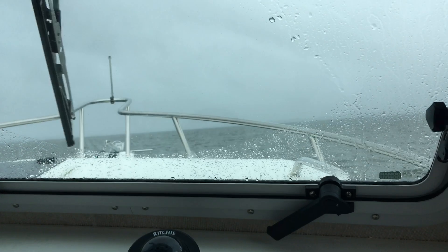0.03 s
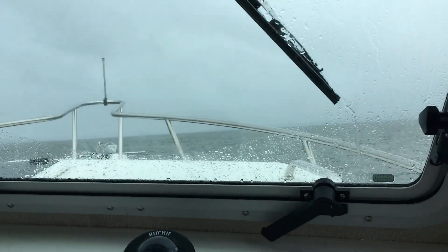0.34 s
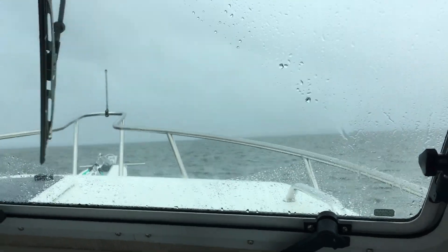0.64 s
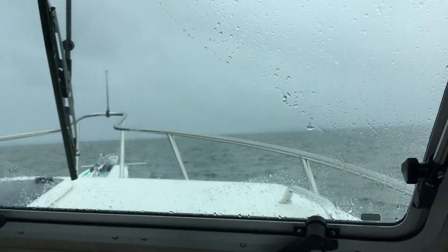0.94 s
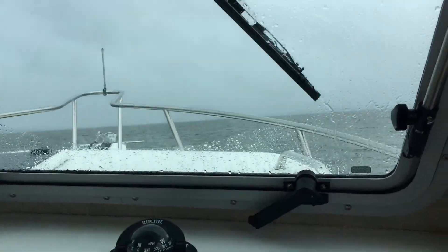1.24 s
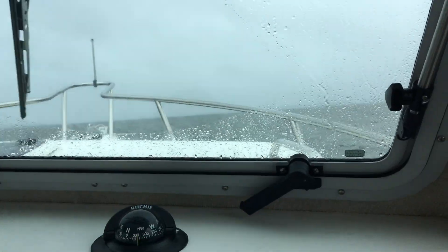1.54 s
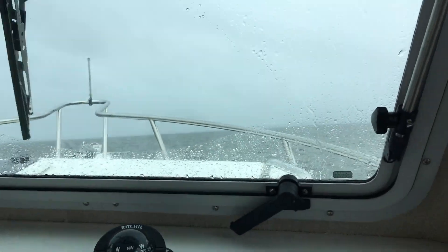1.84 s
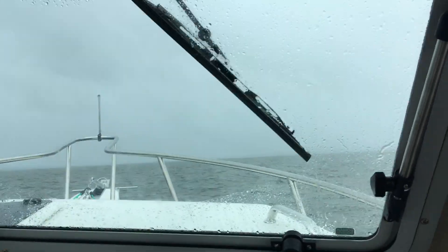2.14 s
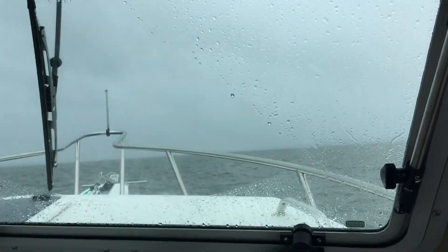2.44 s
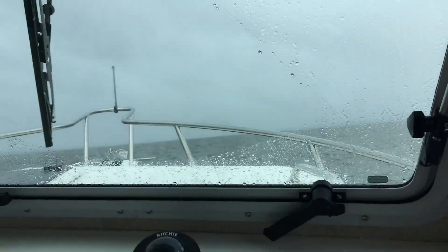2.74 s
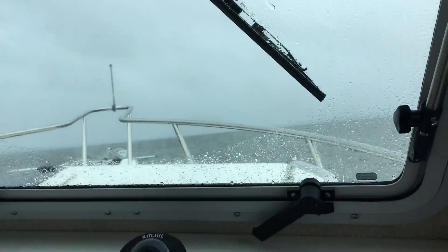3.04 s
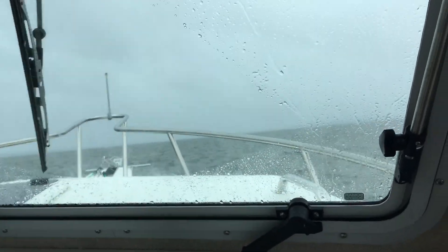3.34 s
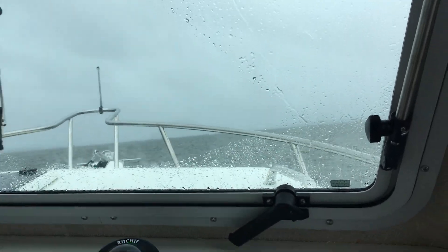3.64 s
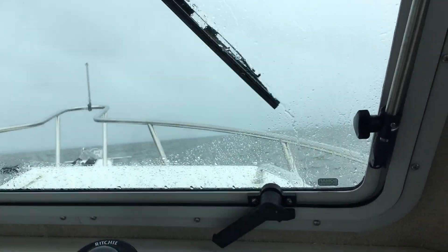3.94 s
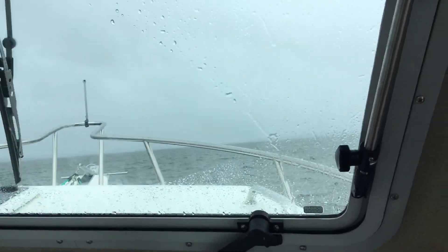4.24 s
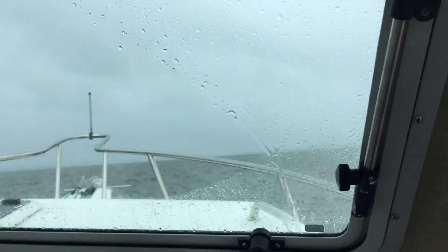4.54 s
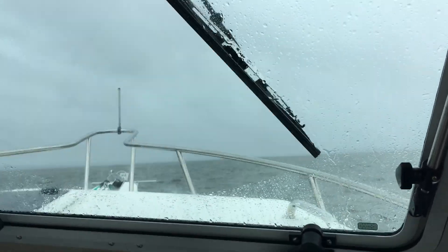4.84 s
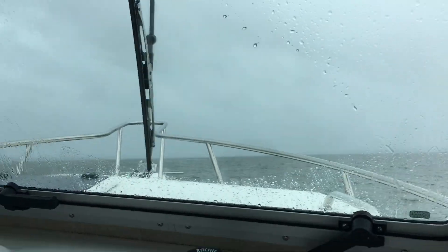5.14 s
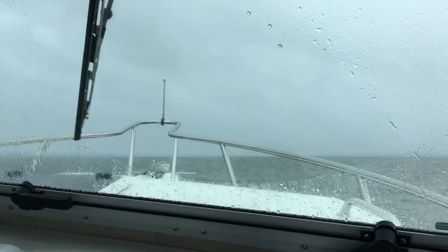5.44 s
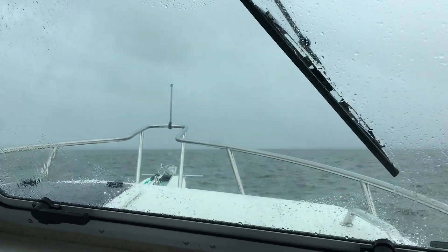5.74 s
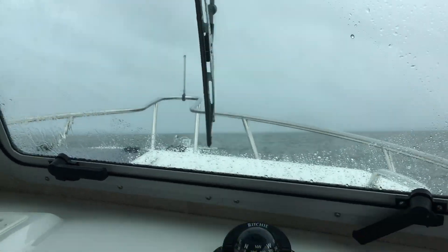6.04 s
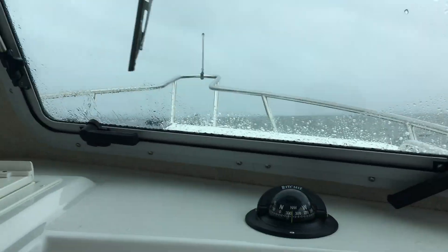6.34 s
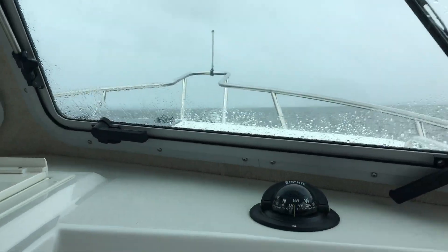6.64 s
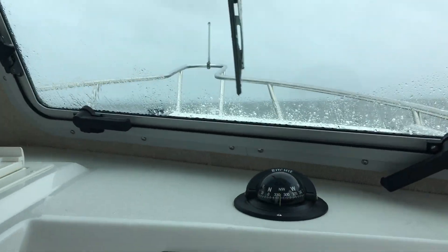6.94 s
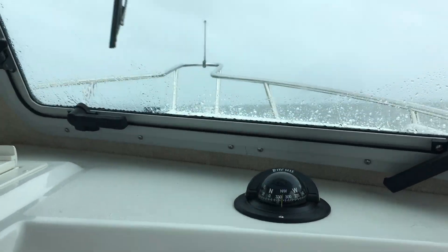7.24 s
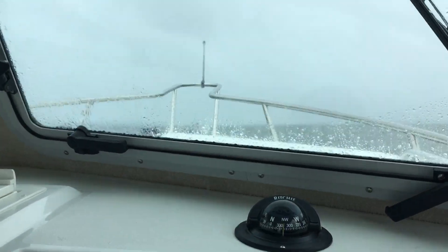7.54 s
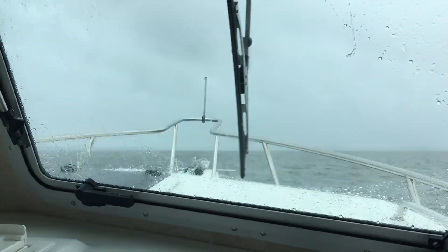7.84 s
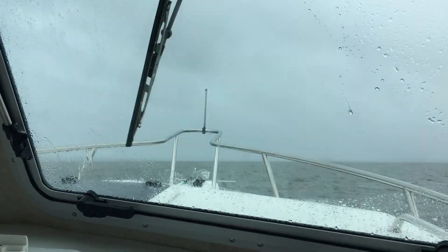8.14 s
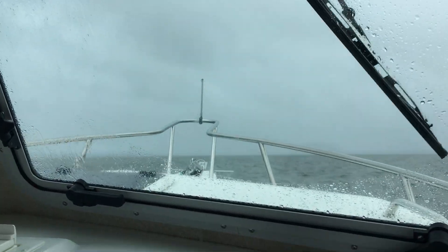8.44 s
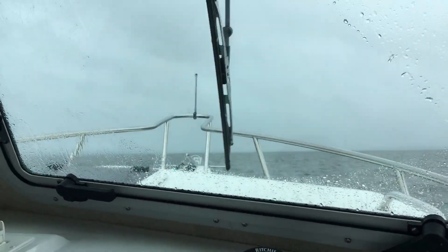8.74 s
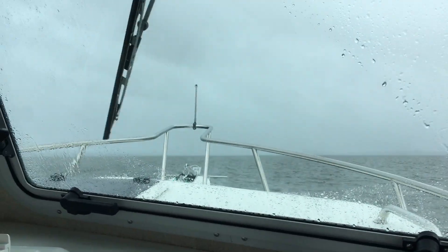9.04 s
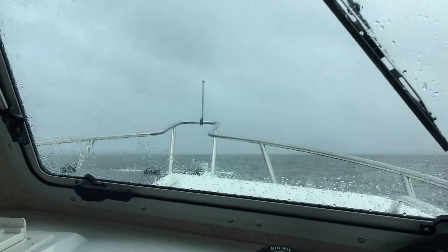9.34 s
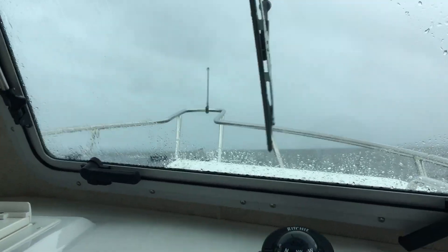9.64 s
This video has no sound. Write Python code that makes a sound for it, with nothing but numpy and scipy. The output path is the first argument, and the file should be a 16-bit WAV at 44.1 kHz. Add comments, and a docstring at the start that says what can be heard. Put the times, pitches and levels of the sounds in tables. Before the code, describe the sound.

Inside the enclosed wheelhouse of a motorboat, the engine drones steadily with a fast throb and light clatter over a deep hull rumble. Choppy waves strike a few times a second, making uneven thuds, slaps and low booms, the hardest about halfway through. Water splashes on deck, spray hisses, and occasional bursts of drops crackle on the windscreen just in front of the microphone.

```python
"""Inside the wheelhouse of a motorboat running through chop.
From the start the engine drones, clatters and beats against the propeller, the hull rumbles, spray hisses.
From 0.3 s waves strike: the bottom thuds, the bow panels slap, the hull booms and water splashes on deck.
From 0.9 s gouts spatter on the windscreen. The hardest thud, near 4.5 s, makes the limiter duck;
around 6 s the engine's higher tones fade a little as the boat comes round."""
import sys
import numpy as np
from scipy import signal
from scipy.fft import rfft, irfft, next_fast_len
from scipy.io import wavfile
from scipy.ndimage import uniform_filter1d, minimum_filter1d

SR = 44100
rng = np.random.default_rng(int(sys.argv[2]) if len(sys.argv) > 2 else 0)


def wav_out(sig):
    """Save sig, one row per channel (or a flat mono array), as 16-bit PCM at SR to the path in sys.argv[1]."""
    wavfile.write(sys.argv[1], SR, np.round(np.clip(np.atleast_2d(sig).T, -1, 1) * 32767).astype(np.int16))


N = 431738


def from_db(db):
    """Amplitude ratio of a level."""
    return 10 ** (np.asarray(db) / 20)


def rms_one(x):
    """Normalisation to unit power."""
    return x / np.sqrt(np.mean(x ** 2) + 1e-20)


def peak_one(x):
    """Normalisation to unit peak."""
    return x / np.abs(x).max()


def in_time(rows):
    """Linear interpolation of each column at every sample."""
    s, *columns = np.transpose(rows)
    return [np.interp(np.arange(N) / SR, s, c) for c in columns]


def colour(x, spectrum):
    """Spectral shaping of a flat excitation; rms 1."""
    size = next_fast_len(N)
    hz, db = np.transpose(spectrum)
    bins = np.maximum(np.arange(size // 2 + 1) * SR / size, 1)
    gain = from_db(np.interp(np.log(bins), np.log(hz), db))
    skirts = np.minimum(bins / hz[0], 1) ** 2 * np.minimum(hz[-1] / bins, 1) ** 2
    return rms_one(irfft(rfft(x, size) * gain * skirts, size)[:N])


def drift(rate_hz):
    """Random modulation: low-passed noise of rms 1."""
    step, settle = 40, 2000
    r = np.exp(-2 * np.pi * step * rate_hz / SR)
    slow = signal.lfilter([1], [1, -2 * r, r * r], rng.standard_normal(N // step + settle + 2))[settle:]
    return np.interp(np.arange(N) / step, np.arange(len(slow)), rms_one(slow))


def resonate(x, hz, width_hz):
    """Second-order resonance with unit peak gain."""
    r = np.exp(-np.pi * width_hz / SR)
    feedback = [1, -2 * r * np.cos(2 * np.pi * hz / SR), r * r]
    return signal.lfilter(np.array([1, 0, -1]) * (1 - r * r) / 2, feedback, x)


def band(x, hz, width_hz):
    """Two equal resonances in cascade."""
    return resonate(resonate(x, hz, width_hz), hz, width_hz)


def ring(force, hz, t60):
    """Damped oscillator: a unit impulse starts a decaying sine of height 1."""
    r, w = from_db(-60 / (t60 * SR)), 2 * np.pi * hz / SR
    return signal.lfilter([0, np.sin(w)], [1, -2 * r * np.cos(w), r * r], force + 1e-18)


def struck(force, modes, centre_hz, octaves):
    """Modal superposition: where a wave lands decides which modes answer most; peak 1."""
    sound = 0
    for hz, db, t60 in modes:
        coupling = from_db(db) / (1 + (np.log2(hz / centre_hz) / octaves) ** 2)
        sound += coupling * ring(force * rng.standard_normal(len(force)), hz, t60)
    return peak_one(sound)


def drops(per_s, spread_db):
    """Shot noise: random impacts, mostly small and a few large."""
    sizes = from_db(spread_db * np.minimum(rng.exponential(1, N), 5)) * rng.choice([-1, 1], N)
    return sizes * (rng.random(N) < per_s / SR)


def add(out, s, sound):
    """Superpose a sound starting at time s."""
    at = max(round(s * SR), 0)
    out[at:at + len(sound)] += sound[:N - at]


def shaft(hz, wander, rate_hz):
    """Frequency modulation: the phase of a rotation whose speed wanders with the load."""
    return 2 * np.pi * np.cumsum(hz * (1 + wander * drift(rate_hz))) / SR


def tones(angle, orders, waver_db):
    """Harmonic series of a rotation, each partial wavering by itself; 0 dB has rms 1."""
    return np.sqrt(2) * sum(
        from_db(db + waver_db * drift(2.37)) * np.sin(k * angle + rng.uniform(0, 2 * np.pi))
        for k, db in orders)


def swells(levels_db, delay_s, width_s):
    """Power summation: a Gaussian envelope after the crest of each of the WAVES."""
    t = np.arange(0, N, 40) / SR
    power = sum((from_db(db) * np.exp(-.5 * ((t - s - crest_s - delay_s) / width_s) ** 2)) ** 2
                for (s, crest_s, *_), db in zip(WAVES, levels_db))
    return np.interp(np.arange(N) / SR, t, np.sqrt(power))


def waver(db, swing_db, rate_hz):
    """Amplitude modulation: a gain that wanders about a level."""
    return from_db(db + swing_db * drift(rate_hz))


# engine harmonics, the third being the firing rate: multiple of crank speed, relative level/dB
ENGINE_ORDERS = [(1, -18), (3, 0), (4, -9), (5, -19), (6, -18), (8, -31), (9, -29), (10, -31), (12, -29)]
# load on the drive: t/s, firing level/dB, propeller level/dB
DRIVE_LOAD = [(0, -23.5, -25), (.7, -24, -23.5), (2.1, -25.5, -25.5), (2.8, -24, -24.5), (4.2, -25, -25.5),
              (5.6, -24.5, -27), (7, -24.5, -29.5), (9.79, -24, -29.5)]
# a high engine order singing in the cabin: t/s, level/dB
SINGING_LEVEL = [(0, -50), (5.6, -51.5), (6.5, -54), (9.79, -52)]
CRANK_HZ, SINGING_ORDER = 34.5, 15

def engine():
    """Periodic excitation: firing gives harmonics of the crank speed."""
    firing_db, _ = in_time(DRIVE_LOAD)
    singing_db, = in_time(SINGING_LEVEL)
    crank = shaft(CRANK_HZ, wander=.0025, rate_hz=1.2)
    drone = from_db(firing_db) * tones(crank, ENGINE_ORDERS, waver_db=2.5)
    singing = from_db(singing_db) * tones(crank, [(SINGING_ORDER, 0)], waver_db=1)
    return drone + singing


# clatter spectrum: f/Hz, relative level/dB
CLATTER_SPECTRUM = [(150, -23), (300, 4), (530, -0.5), (650, -4.5), (800, -9.5), (1000, -8), (1180, -10),
                    (1310, -24.5), (1450, -15), (2400, -16.5), (4000, -22.5), (9000, -64)]
# machinery whines: f/Hz, bandwidth/Hz, relative level/dB
WHINE_BANDS = [(1297, 174, -57.5), (4386, 83, -69.5)]

def machinery():
    """Broadband noise clatters; narrowband noise whines, fading a little as the boat comes round."""
    clatter = from_db(-42.5) * colour(rng.standard_normal(N), CLATTER_SPECTRUM)
    turn_db, = in_time([(0, 4.5), (4.3, 3), (5.6, 0.5), (9.79, 3)])  # t/s, gain/dB
    whine = sum(waver(db + turn_db, 2, rate_hz=2.2) * rms_one(band(rng.standard_normal(N), hz, width_hz))
                for hz, width_hz, db in WHINE_BANDS)
    return clatter + whine


# propeller harmonics: multiple of blade rate, relative level/dB
BLADE_ORDERS = [(1, 0), (2, -21), (3, -34)]
BLADE_HZ = 118.1

def propeller():
    """Beating: the blade tone interferes with the firing tone about fifteen times a second."""
    _, blade_db = in_time(DRIVE_LOAD)
    blade = shaft(BLADE_HZ, wander=.004, rate_hz=2.5)
    return from_db(blade_db) * tones(blade, BLADE_ORDERS, waver_db=2.36)


# hull rumble spectrum: f/Hz, relative level/dB
RUMBLE_SPECTRUM = [(20, -30), (40, -24), (65, -4), (82, -0.5), (113, -4.5), (133, -11), (150, -8.5),
                   (165, -17.5), (200, -16), (238, -15.5), (260, -39.5), (400, -33), (900, -56)]

def hull():
    """Forced vibration: flow keeps the hull rumbling; its lowest mode booms just after each wave."""
    *_, boom_db = np.transpose(WAVES)
    chop = waver(-29, 4.5, rate_hz=7)
    heave = np.hypot(swells(boom_db, delay_s=.055, width_s=.035), chop)
    lowest_mode = [(24, -26), (40, -15.5), (50, -2), (56, -2.5), (62, -6), (76, -17)]  # f/Hz, level/dB
    flex = colour(rng.standard_normal(N), lowest_mode)
    envelope = np.abs(signal.hilbert(flex, next_fast_len(N))[:N])
    boom = heave * rms_one(flex / (envelope + 1.2))  # evened out, so that the heave shapes it
    rumble = waver(-23.5, 1.67, rate_hz=8.2) * colour(rng.standard_normal(N), RUMBLE_SPECTRUM)
    return boom + rumble


# spectra of bow wash, deck splash and fine spray: f/Hz, relative level/dB
WASH_SPECTRUM = [(120, -36), (250, 9), (400, 0.5), (560, 5), (750, -3), (1300, -7.5), (2500, -14.5),
                 (6000, -33)]
SPLASH_SPECTRUM = [(400, -36), (900, 6.5), (1500, 3.5), (2500, 3.5), (3300, 0.5), (4500, -4.5), (7000, -11),
                   (15000, -11.5)]
SPRAY_SPECTRUM = [(1000, -21), (3000, -14.5), (6000, 4.5), (9000, 3), (12000, 1.5), (16000, -0.5)]
# water in the air: t/s, splash level/dB, relative spray level/dB
AIRBORNE_WATER = [(0, -46, -51), (.3, -50, -52.5), (1.25, -48, -52.5), (1.53, -48.5, -49),
                  (1.8, -51, -54.7), (2.3, -49.5, -52.5), (2.9, -46.5, -50.5), (3.5, -51, -53),
                  (4.44, -49, -53), (4.48, -57, -46.5), (4.55, -54, -54), (4.7, -48.5, -51),
                  (5.1, -49, -51), (5.4, -51.5, -53.5), (5.8, -46, -53.5), (6.1, -49, -49.3),
                  (6.72, -50, -53), (7.22, -48, -50), (7.68, -48.5, -53), (7.97, -48, -49.5),
                  (8.13, -46.5, -53), (8.75, -50.5, -50.5), (8.9, -50, -49.5), (9.15, -45.5, -53.5),
                  (9.4, -47, -51), (9.53, -49, -51.5), (9.79, -45.5, -47)]
WASH_OVER_SLAP_DB, SPLASH_OVER_SLAP_DB = -18.5, -32.5

def water():
    """Shot noise of drops: wash gurgles at the bow, water splashes on deck, spray hisses on the glass."""
    *_, slap_db, _, _ = np.transpose(WAVES)
    splash_db, spray_db = in_time(AIRBORNE_WATER)
    chop = waver(-48, 3.5, rate_hz=5.1)
    bow = np.hypot(swells(slap_db + WASH_OVER_SLAP_DB, delay_s=.004, width_s=.034), chop)
    thrown = np.hypot(swells(slap_db + SPLASH_OVER_SLAP_DB, delay_s=.04, width_s=.07), from_db(splash_db))
    wash = bow * waver(0, 2, rate_hz=32) * colour(drops(1500, spread_db=3), WASH_SPECTRUM)
    splash = thrown * waver(0, 1.2, rate_hz=31) * colour(drops(7000, spread_db=2.5), SPLASH_SPECTRUM)
    spray = waver(spray_db + 2.5, .78, rate_hz=24) * colour(drops(30000, spread_db=3), SPRAY_SPECTRUM)
    return wash + splash + spray


# hull and cabin modes: f/Hz, relative level/dB, T60/s
HULL_MODES = [(87, 3.5, 0.59), (95, -31, 0.06), (119.8, 5, 0.1), (159, 0.5, 0.25), (201, 10.5, 0.11),
              (225, -2.5, 0.21)]

def thud(t, crest_s, hz):
    """Added mass: the struck bottom sinks in pitch as it digs in and drags more water along; peak 1."""
    age = t / (crest_s + .0077)
    swell = (age * np.exp(1 - age)) ** 2.15
    pitch = hz * (.97 + .13 * np.tanh(1 - age) + .03 * drift(25)[:len(t)])
    swing = swell * np.sin(2 * np.pi * np.cumsum(pitch) / SR + rng.uniform(0, 2 * np.pi))
    return peak_one(swing + from_db(-5.5) * struck(swell, HULL_MODES, hz, octaves=.82))


# bow panel modes: f/Hz, relative level/dB, T60/s
PANEL_MODES = [(295, 3, 0.12), (339, 1, 0.085), (372, 4.5, 0.1), (446, -3, 0.14), (490, 1, 0.038),
               (542, -2.5, 0.094), (594, -11.5, 0.088), (727, -2, 0.039), (906, -3.5, 0.022),
               (1090, 7, 0.011), (1390, 4.5, 0.013), (1660, 1, 0.026), (2370, 8, 0.013)]
# waves striking the hull: t/s, rise to crest/s, thud level/dB, nominal thud f/Hz,
# relative slap level/dB, slap centre f/Hz, boom level/dB
WAVES = [(.333, 0.011, -10, 146, -25.5, 460, -15), (.539, 0.017, -11.5, 120, -47, 700, -35),
         (0.729, 0.031, -27, 99, -32, 600, -17), (.905, 0.019, -9.5, 112, -33, 1000, -16),
         (1.019, 0.02, -2.5, 121.3, -25, 523, -15.5), (1.198, 0.025, -9.5, 115, -29, 674, -19.5),
         (1.432, 0.022, -8.5, 116, -29, 690, -15), (1.561, 0.021, -8.5, 119.5, -29.5, 836, -33),
         (1.77, 0.0057, -10.5, 104, -42, 700, -11), (2.16, 0.0086, -8.5, 131, -27, 600, -12),
         (2.512, 0.025, -12.5, 163.2, -24.5, 610, -14.5), (2.92, 0.011, -13.5, 133, -25.5, 513, -26),
         (3.002, 0.0045, -7.5, 114.6, -37, 700, -36), (3.186, 0.019, 0.5, 107, -19.5, 530, -14.5),
         (3.42, 0.012, -5.5, 105.7, -27, 600, -15.5), (3.752, 0.0082, -8.5, 108, -23.5, 600, -13.5),
         (4.237, 0.015, -7, 106.7, -30, 553, -12.5), (4.459, .019, 4.2, 115, -16.5, 580, -10),
         (4.702, 0.028, -13, 133, -31, 600, -18), (5.11, 0.022, -24, 141, -38, 796, -28),
         (5.628, 0.015, -6.5, 119, -24, 544, -17.5), (5.71, 0.027, -10.5, 99.7, -36, 900, -20),
         (5.85, 0.015, -18, 121, -23, 664, -10), (6.128, 0.017, -5, 117, -23.5, 470, -9.5),
         (6.36, 0.023, -19, 118, -50, 600, -18.5), (6.62, 0.018, -1.5, 118.2, -19.5, 516, -10.5),
         (6.92, 0.01, -14.5, 158, -26, 560, -18.5), (7.05, 0.015, -21, 140, -34.5, 1090, -21),
         (7.28, 0.03, -35, 101, -34, 750, -14.5), (7.416, 0.013, -8.5, 116, -22.5, 540, -11),
         (7.716, 0.024, -10.5, 105, -31, 600, -12.5), (7.954, 0.022, -7, 123, -25, 500, -17),
         (8.08, 0.014, -6.5, 90, -29, 660, -20), (8.497, .011, -0.5, 117, -16.5, 370, -13),
         (8.923, 0.017, -20.5, 159, -22, 366, -16), (9.041, 0.028, -18.5, 108, -43, 600, -15.5),
         (9.271, 0.025, -14, 122, -24.5, 680, -12.5), (9.316, 0.031, -15, 104, -31, 590, -13.5),
         (9.595, 0.018, -22, 146, -25.5, 497, -12.5)]

def slams():
    """Impact excitation: each wave's push thuds the hull and slaps the panels, and water sheets off."""
    out, t = np.zeros(N), np.arange(SR // 2) / SR
    for s, crest_s, thud_db, thud_hz, slap_db, slap_hz, _ in WAVES:
        crest_s = max(crest_s, .005)
        push = t / crest_s * np.exp(1 - t / crest_s)
        slap = from_db(slap_db + 1) * struck(push ** 1.75, PANEL_MODES, slap_hz, octaves=.68)
        sheet = peak_one(band(rng.standard_normal(len(t)) * push, hz=1150, width_hz=2000))
        wetness = (slap_hz / 550) ** 2.1  # a higher-pitched slap is a wetter one
        add(out, s - .005, from_db(thud_db) * thud(t, crest_s, thud_hz))
        add(out, s - .003, slap + from_db(slap_db - 15) * wetness * sheet)
    return out


# gouts landing on the windscreen: t/s, relative crackle level/dB, relative tick level/dB
GOUTS = [(.928, -49, -50), (1.574, -45, -56), (2.564, -32, -50), (2.869, -36, -52), (2.899, -37, -52),
         (3.323, -38, -50), (5.859, -47, -56), (6.63, -27.5, -54), (6.82, -33, -50), (6.846, -33.5, -44),
         (7.429, -38, -54), (8.609, -36.5, -56), (9.391, -30, -41), (9.418, -32, -39)]

def spatters():
    """Impact transients: each gout ticks on the pane and bursts into a short bright crackle."""
    out, t = np.zeros(N), np.arange(SR // 6) / SR
    for s, crackle_db, tick_db in GOUTS:
        burst = rng.standard_normal(len(t)) ** 3 * (1 - np.exp(-t / .0023)) * np.exp(-t / .019)
        crackle = peak_one(resonate(burst, hz=2660, width_hz=1220))
        tick = peak_one(resonate(burst * np.exp(-t / .008), hz=9800, width_hz=9000))
        add(out, s - .002, from_db(crackle_db + 4) * crackle + from_db(tick_db + 10) * tick)
    return out


def scene():
    """Superposition: all sources add at one microphone behind the windscreen."""
    return (engine() + machinery() + propeller() + hull() + slams() + water() + spatters())[None]


def limiter(x):
    """Gain control: peaks are held under a ceiling; a long overload ducks the gain for nearly 0.5 s."""
    ceiling, release_db_per_s = .71, 35
    hold, ahead, window = int(.44 * SR), int(.011 * SR), int(.045 * SR)
    over_db = 20 * np.log10(np.maximum(np.abs(x) / ceiling, 1))
    recent_power = uniform_filter1d(x * x, window, origin=(window - 1) // 2)
    recent_db = 10 * np.log10(np.maximum(recent_power, 1e-9))
    duck_db = np.clip(6 * (recent_db + 4.5), 0, 5)
    held_db = -minimum_filter1d(-duck_db, hold, origin=(hold - 1) // 2, mode="constant")
    # the duck and the first 2 dB of any cut recover slowly, the rest at once
    ramp = release_db_per_s * np.arange(N) / SR
    slow_db = np.maximum.accumulate(np.maximum(np.minimum(over_db, 2), held_db) + ramp) - ramp
    cut_db = np.maximum(over_db, slow_db)
    widened_db = -minimum_filter1d(-cut_db, 2 * ahead)
    return x * from_db(-uniform_filter1d(widened_db, ahead))


# microphone port notches: f/Hz, bandwidth/Hz, depth (0-1)
PORT_NOTCHES = [(4920, 340, 0.35), (7740, 750, 0.35), (10480, 410, 0.6)]
CUTOFF_HZ = 15750

def record(dry):
    """Antiresonance: the microphone port notches the treble; the limiter and a steep low-pass follow."""
    x = dry[0]
    for hz, width_hz, depth in PORT_NOTCHES:
        x = x - depth * resonate(x, hz, width_hz)
    low_pass = signal.ellip(12, .1, 90, CUTOFF_HZ, fs=SR, output="sos")
    return signal.sosfilt(low_pass, limiter(x))[None]


dry = scene()
out = record(dry)
wav_out(out)
```